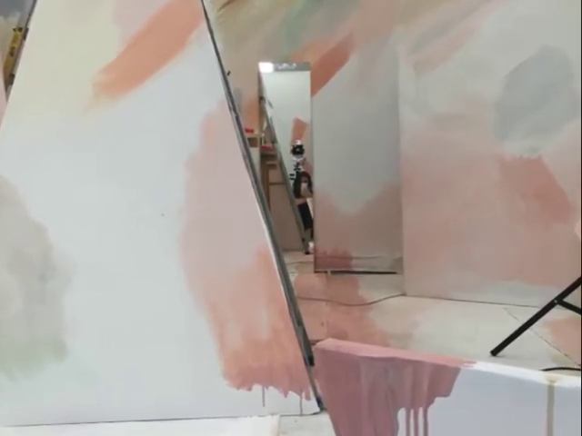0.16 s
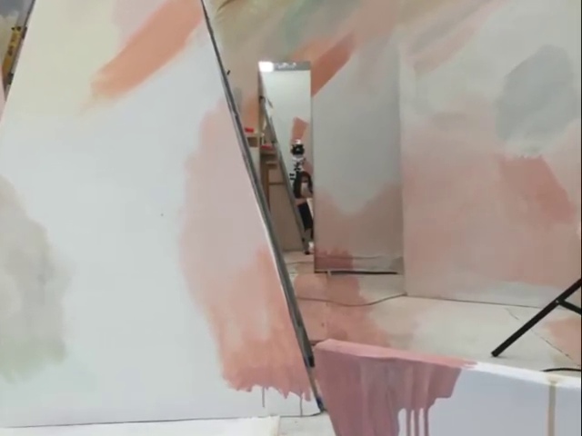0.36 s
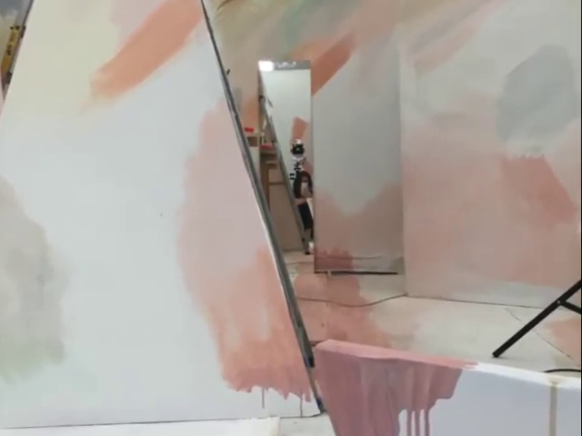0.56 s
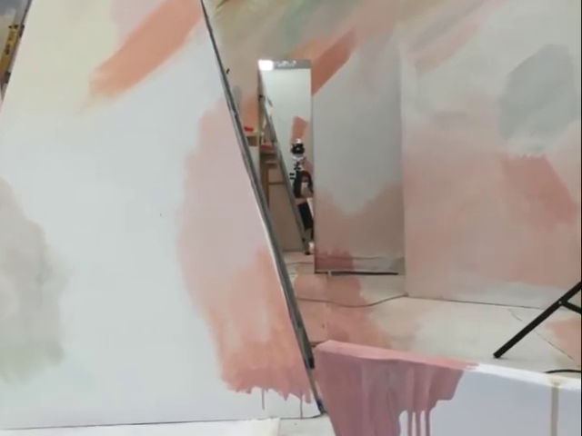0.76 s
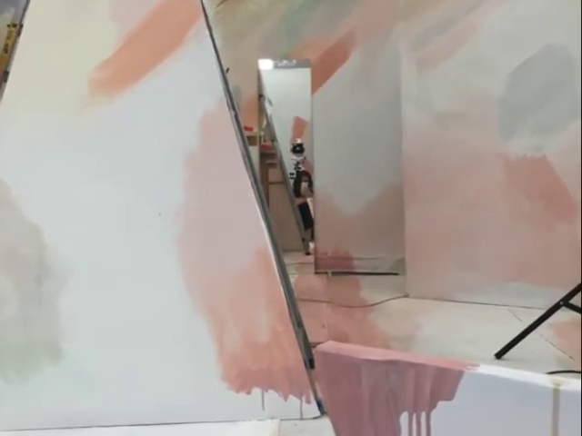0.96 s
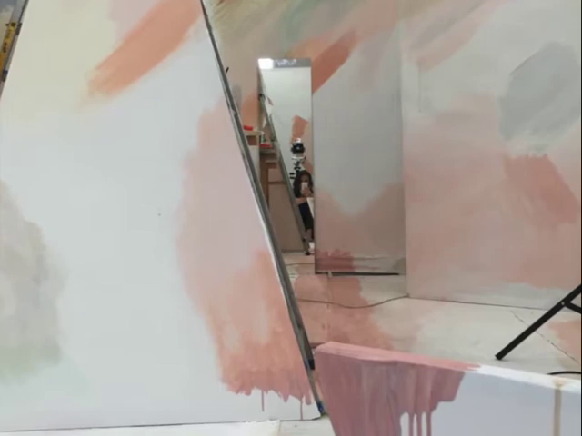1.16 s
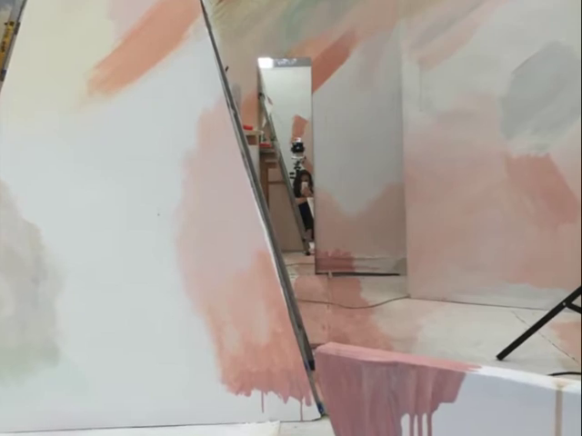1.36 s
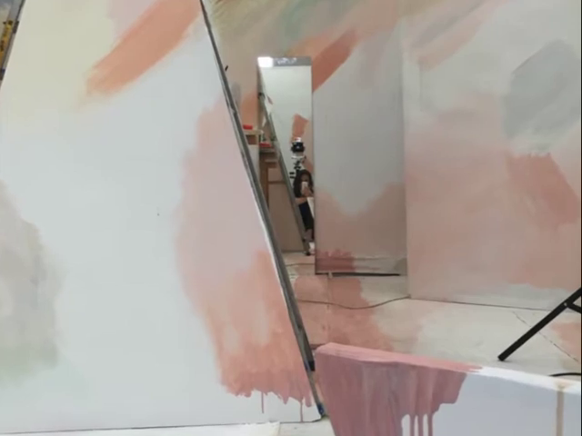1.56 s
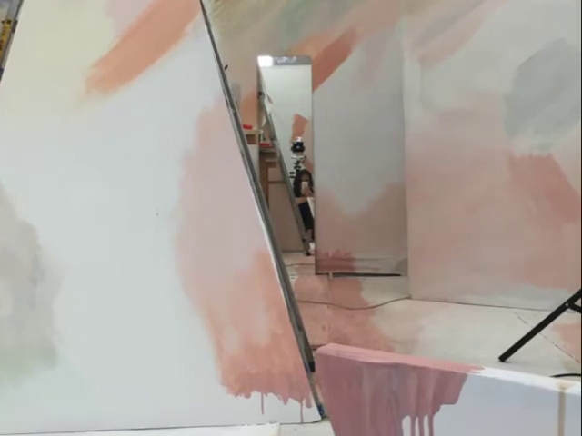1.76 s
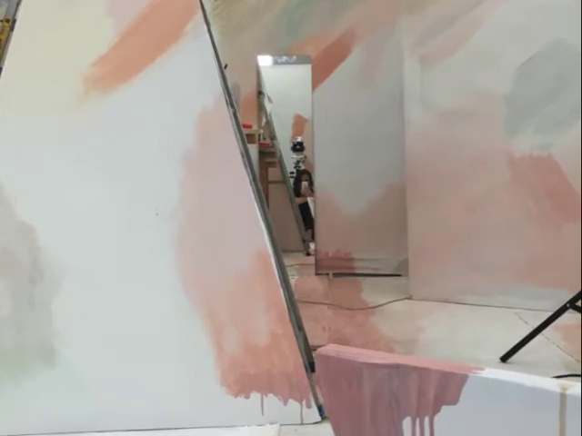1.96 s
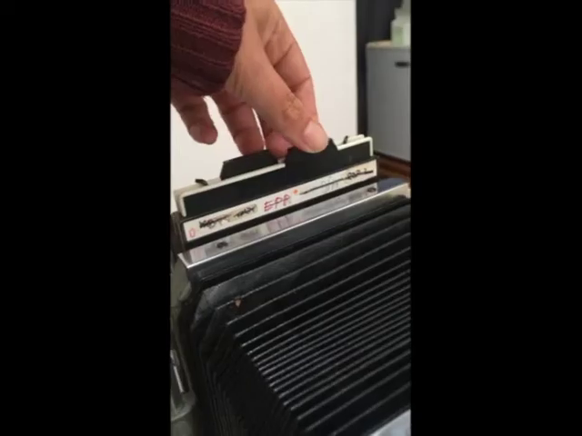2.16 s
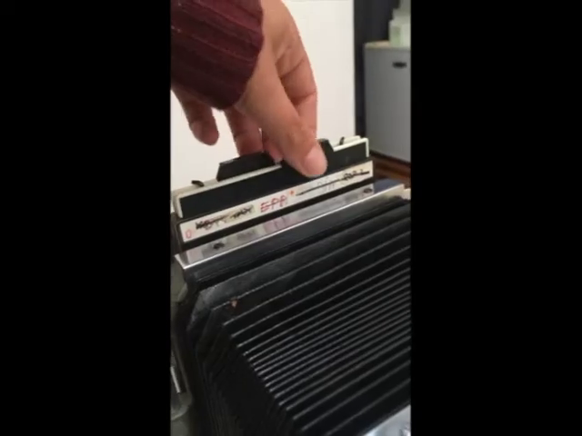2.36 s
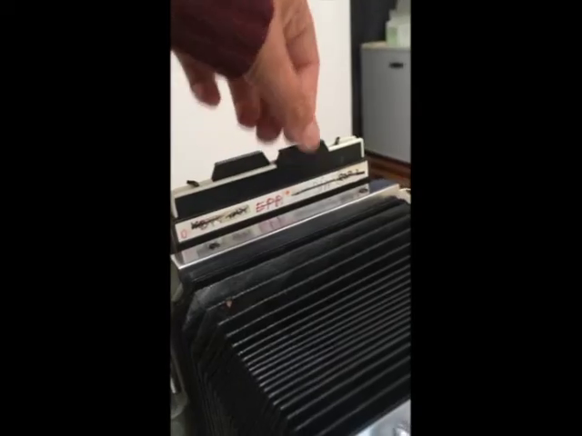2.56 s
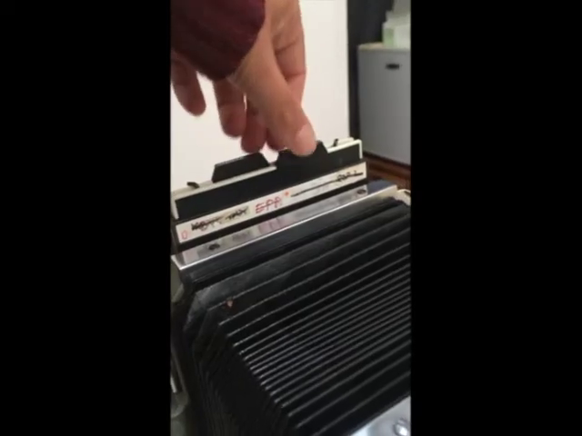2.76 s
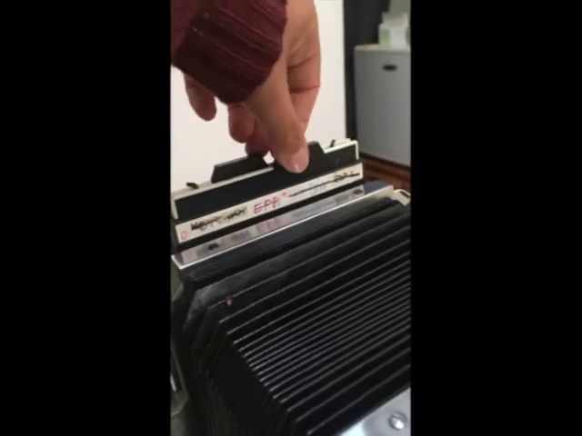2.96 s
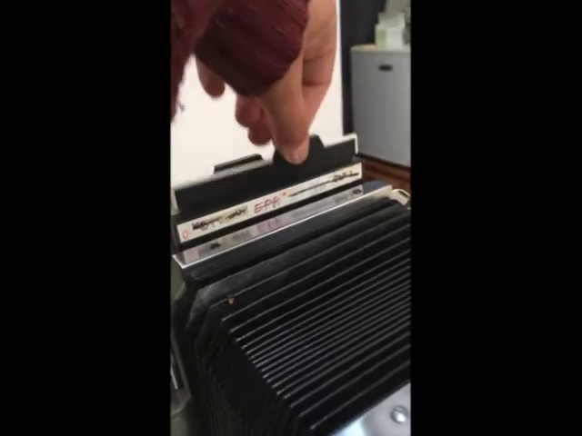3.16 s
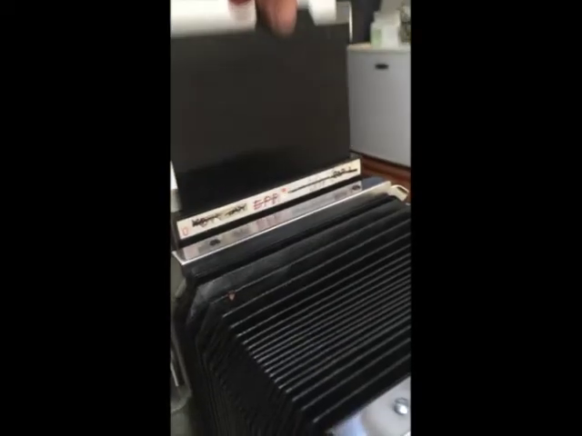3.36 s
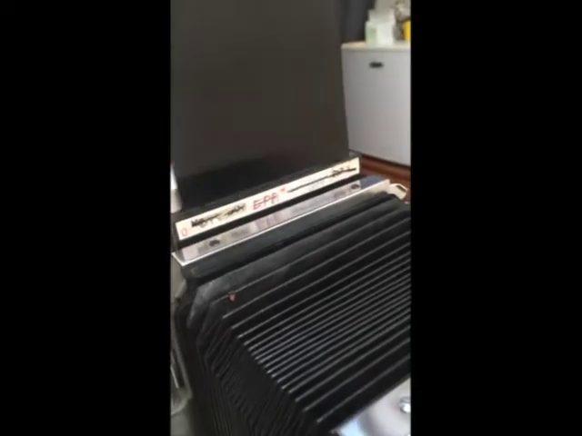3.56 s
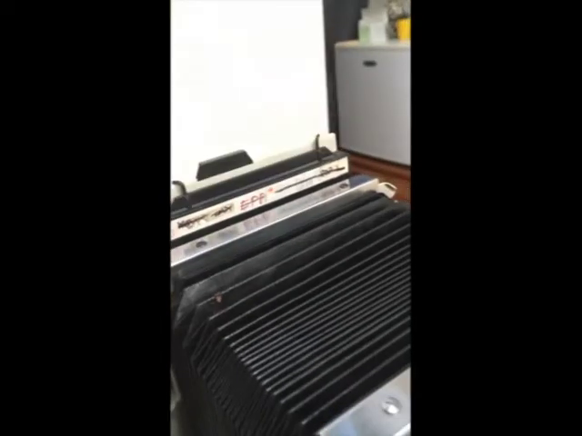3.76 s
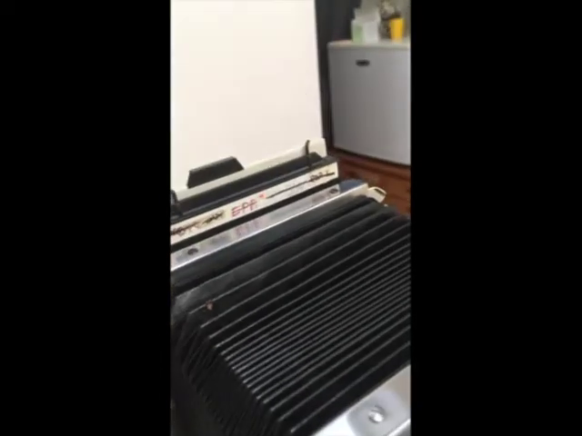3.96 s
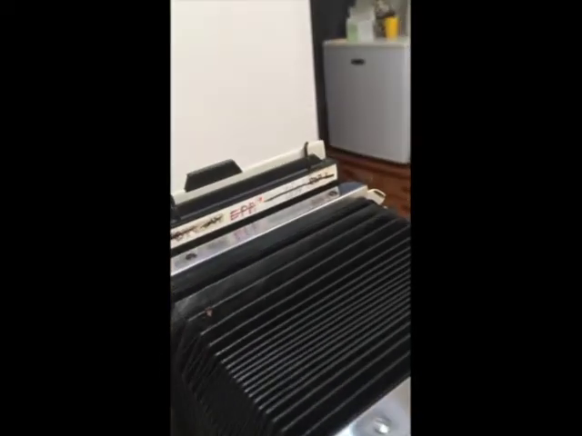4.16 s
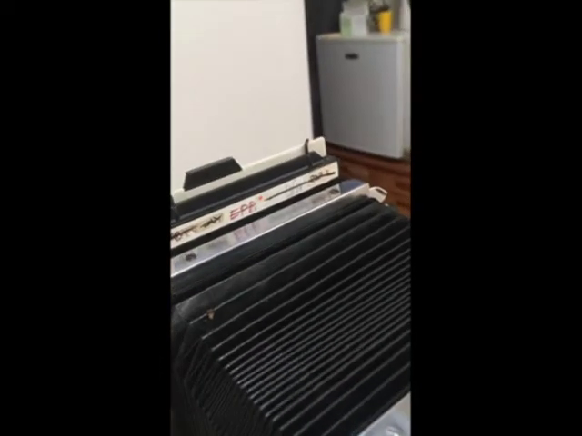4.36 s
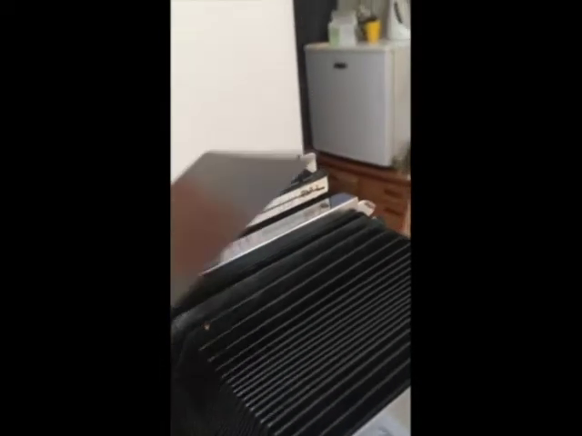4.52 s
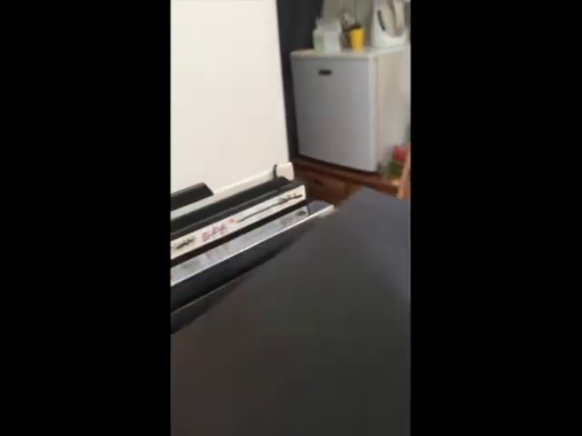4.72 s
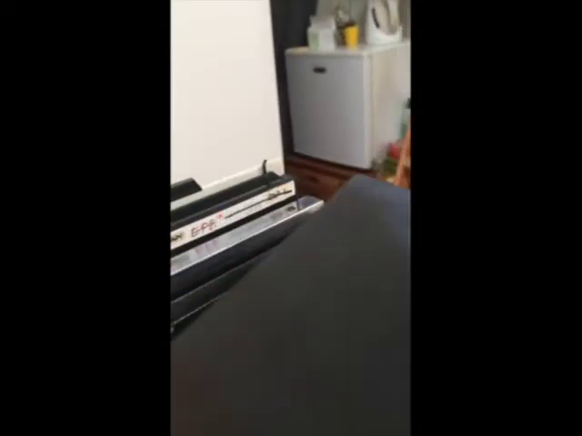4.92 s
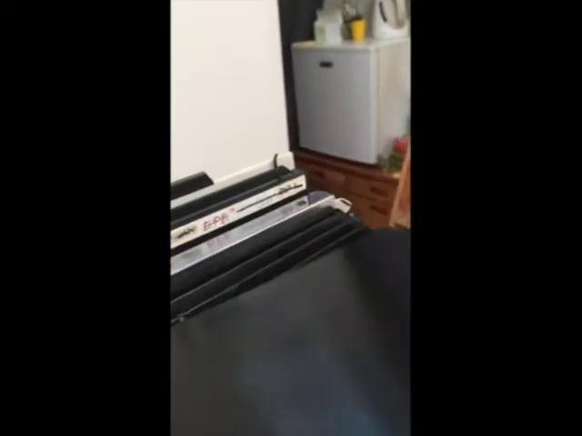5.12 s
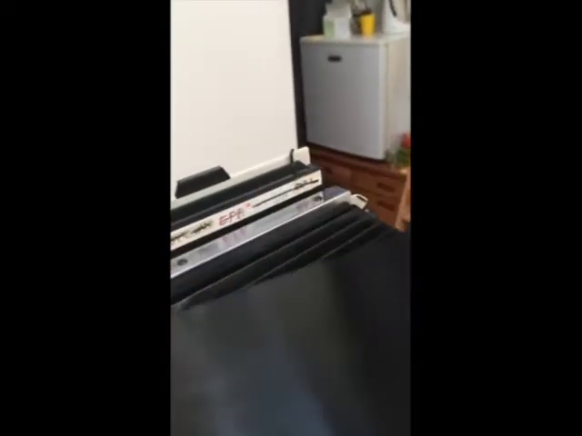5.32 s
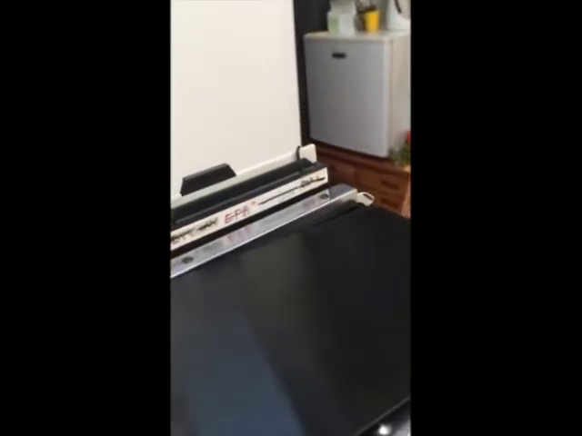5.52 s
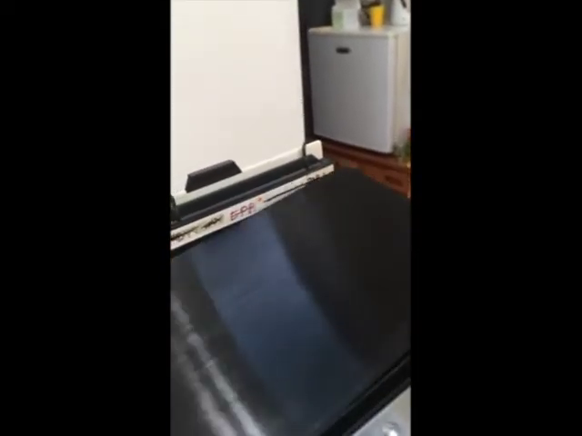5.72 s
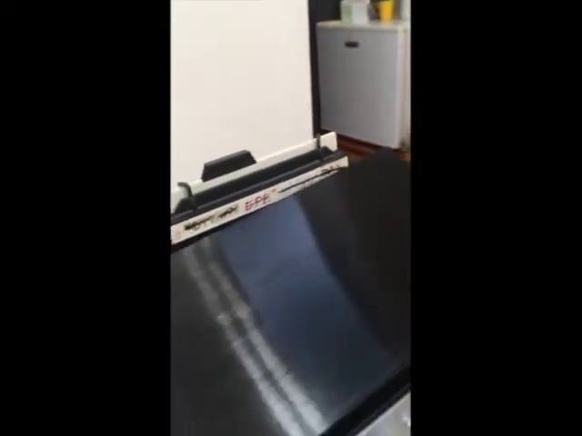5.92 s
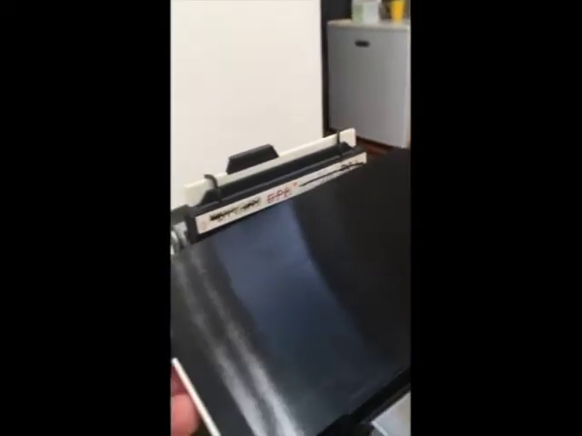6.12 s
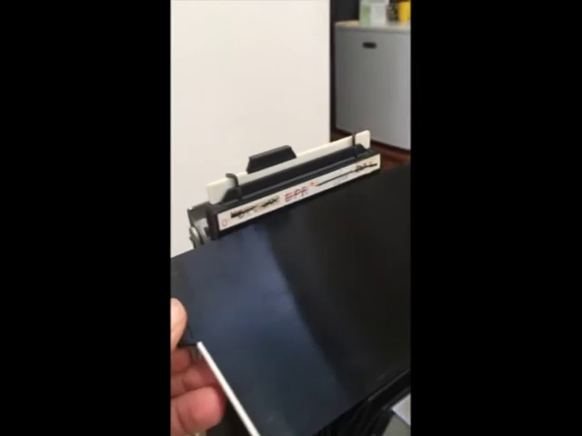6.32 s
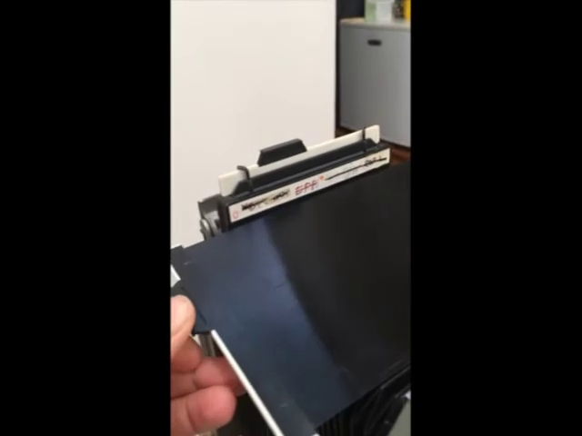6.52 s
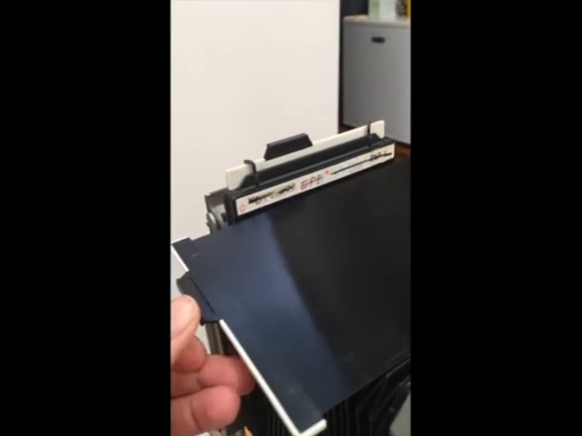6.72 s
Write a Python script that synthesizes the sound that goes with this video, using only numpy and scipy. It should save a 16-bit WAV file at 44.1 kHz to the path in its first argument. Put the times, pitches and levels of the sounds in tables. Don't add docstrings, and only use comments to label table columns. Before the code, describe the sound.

Throughout, low street rumble, wavering engine hum and faint hiss. At 0 s cloth rustles softly; around 0.6 and 1.0 s two dull distant footsteps land on floorboards with room reflections, the first firmer, amid sleeve rustle. At 2.0 s a brief dead gap marks the cut. Fingers brush plastic, with a click and scuff near 2.5 s and a tiny tick at 2.8. From 3.08 to 3.55 s a stiff sheet is pulled from a felt slot: knock, squeaky stick-slip rasp growing brighter, sharp closing clacks. Quiet until 4.47 s, a piercing hard snap with quick rebounds. At 4.75 s it drops loudly with a hollow thump, bouncing at 4.82 and faintly at 4.9. Light taps and swishing ridged drags follow from 5.1 to 5.5 s, sharp rub and clack at 5.53-5.63, then small clicks at 5.94 and 6.1-6.2, fading into hum until about 6.8.

```python
import sys
import numpy as np
from scipy import signal
from scipy.fft import rfft, irfft
from scipy.io import wavfile
from scipy.ndimage import uniform_filter1d

SR = 44100
rng = np.random.default_rng(int(sys.argv[2]) if len(sys.argv) > 2 else 0)


def persist_wave(psi):
    counts = np.round(np.clip(psi, -1, 1) * 32767).astype(np.int16)
    wavfile.write(sys.argv[1], SR, np.atleast_2d(counts).T)


def decibels_to_gain(level_db):
    exponent = np.asarray(level_db, float) / 20
    return 10 ** exponent


N = 299144


def in_time(rows, outside=None):
    s, *columns = np.transpose(rows)
    return [np.interp(np.arange(N) / SR, s, column, outside, outside) for column in columns]


def at_hz(points, hz):
    point_hz, value = np.transpose(points)
    return np.interp(np.log(hz), np.log(point_hz), value)


def rms_one(x):
    return x / np.sqrt(np.mean(x ** 2) + 1e-20)


def decay(t, t60):
    return decibels_to_gain(-60 * t / t60)


def band(x, low_hz, high_hz):
    return signal.sosfilt(signal.butter(2, [low_hz, high_hz], "band", fs=SR, output="sos"), x)


def drift(rate):
    r = np.exp(-2 * np.pi * rate * 8 / SR)
    slow = signal.lfilter([1], [1, -2 * r, r * r], rng.standard_normal(N // 8 + 5002))
    slow = rms_one(slow[5000:])
    return np.interp(np.arange(N) / 8, np.arange(len(slow)), slow)


def coloured(x, spectrum):
    hz = np.maximum(np.arange(N // 2 + 1) * SR / N, 1)
    return rms_one(irfft(rfft(x) * decibels_to_gain(at_hz(spectrum, hz)), N))


def ring(x, hz, t60):
    r, w = decibels_to_gain(-60 / (t60 * SR)), 2 * np.pi * hz / SR
    return signal.lfilter([0, np.sin(w)], [1, -2 * r * np.cos(w), r * r], x + 1e-18)


def strokes(rows):
    out, t = np.zeros((2, N)), np.arange(N) / SR
    rise_db, fall_db, roundness = 18, 26.5, 1.11
    for start, top, end, *db in rows:
        end = max(end, top + .012)
        span = slice(round(start * SR), round(end * SR))
        away = np.interp(t[span], [start, top, end], [-1, 0, 1])
        drop_db = np.where(away < 0, rise_db, fall_db) * np.abs(away) ** roundness
        out[:, span] += decibels_to_gain(np.c_[db] - drop_db)
    return uniform_filter1d(out, size=180)


# time_s, level_db
TONE = [(0, -54), (.26, -60), (1.96, -60), (2.02, -64), (3.0, -63), (4.4, -63), (5.1, -56.5), (5.3, -61),
        (5.7, -62), (6.78, -62)]
# pitch_hz, density_db_per_hz
AIR = [(15, -22.5), (25, -9), (43, -9), (65, -5), (90, -4.5), (182, -15.5), (306, -22.5), (421, -29.5),
       (724, -31), (866, -30), (1970, -34), (3000, -43.5), (3900, -53.5), (6600, -120)]
# pitch_hz, density_db_per_hz
HISS = [(1470, -24), (2500, -0.5), (3280, -5.5), (3600, -3.5), (4440, -8.5), (5740, -5.5), (6600, -4),
        (7830, -10), (8530, -4.5), (10400, -7.5), (11700, -3.5), (15200, -2.5), (16000, -15)]
# time_s, pitch_hz, level_db
LOW_DRONE = [(0, 38.8, -52), (1.0, 40.84, -41.5), (1.6, 47.5, -50.5), (2.6, 48, -45), (4.4, 47.7, -49),
             (5.1, 46.84, -50), (5.4, 42.84, -39), (6.6, 39.86, -37), (6.78, 41, -52)]
HIGH_DRONE = [(0, 71.64, -39), (.68, 74.54, -37), (.85, 78.7, -57), (1.0, 84.75, -43), (1.6, 84.15, -64),
              (1.95, 89.64, -41.5), (2.1, 82.4, -54.5), (4.2, 85.97, -45.5), (5.1, 78.9, -53.5),
              (6.78, 83, -48.5)]
# start_s, end_s
GAP_S = (1.9797, 2.0083)


def room_tone():
    air = coloured(rng.standard_normal(N), AIR)
    air /= np.std(band(air, 400, 2500))
    air *= decibels_to_gain(drift(5))
    hiss_db = -66.5 + 1.46 * (np.arange(N) < GAP_S[0] * SR)
    hiss = coloured(rng.standard_normal(N), HISS)
    out = decibels_to_gain(in_time(TONE)[0] + 0.07) * air + decibels_to_gain(hiss_db) * hiss
    for rows in (LOW_DRONE, HIGH_DRONE):
        hz, db = in_time(rows)
        phase = 2 * np.pi * np.cumsum(hz * (1 + 0.03225 * drift(4.55))) / SR
        out += decibels_to_gain(db + 0.3 + 1.0 * drift(10.0)) * np.sin(phase)
    return out


# start_s, strongest_s, end_s, dull_db, bright_db
RUSTLE = [(0, .008, 0.17, -52, -59.5), (.12, .196, 0.3, -60.5, -80), (.56, .6, 0.73, -57, -67),
          (.66, .754, 0.93, -54.5, -59), (.92, .994, 1.11, -61.5, -85), (2.2, 2.24, 2.33, -63, -64)]
# start_s, strongest_s, end_s, upper_db, lower_db
GRIP = [(2.205, 2.222, 2.27, -64, -66), (2.22, 2.262, 2.33, -66, -70), (2.39, 2.45, 2.63, -65, -58),
        (2.5, 2.522, 2.55, -52, -43.5)]


def rustle():
    dull = rms_one(band(rng.standard_normal(N), 330, 4500))
    bright = rms_one(band(rng.standard_normal(N), 6400, 18000))
    dull_gain, bright_gain = strokes(RUSTLE)
    upper_gain, lower_gain = strokes(GRIP)
    skin = rng.standard_normal(N) * decibels_to_gain(2.0 * drift(120))
    upper = rms_one(band(band(skin, 4400, 6800), 4400, 6500))
    lower = rms_one(band(skin, 840, 1940))
    return dull_gain * dull + bright_gain * bright + upper_gain * upper + lower_gain * lower


# time_s, pitch_hz, level_db, length_s
SQUEAKS = [(3.198, 9300, -40, .014), (3.141, 3200, -41, 0.022), (3.228, 2960, -38, 0.0064),
           (3.437, 4400, -33, 0.007), (3.454, 4300, -37, .006), (0.145, 1670, -59, 0.073),
           (3.121, 2280, -34, 0.017), (3.163, 4500, -35.5, 0.012), (3.173, 900, -42, 0.015),
           (3.245, 6200, -38, 0.008), (3.246, 4500, -40, 0.012), (3.281, 3680, -36, 0.017),
           (3.302, 5330, -38, 0.019), (3.307, 3020, -38, 0.0075), (3.316, 5500, -33, 0.01),
           (3.336, 3040, -32.5, 0.0057), (3.343, 5860, -34.5, 0.0092), (3.346, 3200, -36, 0.019),
           (3.4, 6000, -43.5, 0.011), (4.916, 1910, -66, 0.031), (4.919, 5700, -54.5, 0.063),
           (5.31, 4300, -52, 0.027), (5.312, 5600, -55, .02), (5.315, 7200, -52, .02),
           (5.352, 7000, -56, .03), (5.354, 3400, -60, 0.057), (5.442, 4270, -53, 0.027),
           (5.526, 4340, -33, 0.017), (5.35, 5490, -56, 0.062), (5.35, 4240, -56, 0.06),
           (5.352, 6300, -50, 0.032), (5.436, 3300, -38.5, 0.025), (5.436, 5600, -53, 0.035),
           (5.489, 2930, -45, 0.021), (5.527, 7170, -28, 0.009), (5.585, 3300, -36, 0.0097),
           (3.486, 9100, -25, 0.011), (5.281, 14200, -40, .014), (5.288, 9000, -49, .01),
           (5.31, 15000, -40, 0.013), (5.366, 13000, -40, .016), (5.377, 10100, -53, 0.025),
           (5.363, 8250, -54, .02), (5.435, 10050, -57, .025), (5.435, 14300, -55, 0.045),
           (5.436, 8150, -58, 0.0092), (5.508, 14900, -42, 0.02), (5.509, 4350, -61, 0.014),
           (5.512, 5730, -61, 0.0099)]


def squeaks():
    out = np.zeros(N)
    for (s, hz, db, length), luck in zip(SQUEAKS, rng.standard_normal((len(SQUEAKS), 4000))):
        shape = np.hanning(int(np.clip(length * SR * 1.2, 60, 4000)))
        tone = rms_one(ring(ring(luck, hz, 0.0087), hz, 0.0087))
        i = round(s * SR)
        out[i:i + len(shape)] += decibels_to_gain(db) * shape * tone[-len(shape):]
    return out


# start_s, peak_db, floor_hz, t60_s, slap_db
STEPS = [
    (0.582, -29.5, 142, 0.12, 10.5),
    (0.593, -19, 159, 0.044, -2),
    (0.625, -32, 240, 0.1, 7),
    (0.965, -35, 273.6, 0.18, 7),
    (0.985, -25, 205, 0.063, -5),
]
# hard_heel_hz, soft_sole_hz
SLAP_TOP_HZ = (745, 424)


def steps():
    out, t = np.zeros(N), np.arange(9000) / SR
    push = np.pad(np.hanning(60) / 30, (0, len(t) - 60))
    for (s, db, hz, t60, slap_db), luck in zip(STEPS, rng.standard_normal((len(STEPS), len(t)))):
        i = round(s * SR)
        top_hz = SLAP_TOP_HZ[int(s > .8)]
        slap = band(band(luck, 220, top_hz), 130, 1.34 * top_hz) * decay(t, 0.092)
        floor = ring(push, hz, t60) + .5 * ring(push, 1.51 * hz, .5 * t60)
        out[i:i + len(t)] += decibels_to_gain(db - 3.5) * (floor + decibels_to_gain(slap_db) * slap)
    return out


# pitch_hz, level_db
CRACK_PEAKS = [(6400, -8), (11800, -3.5), (15000, -4)]
# pitch_hz, level_db, t60_s
HOLDER = [(935, -6, 0.095), (980, -10, 0.045), (1240, -5, 0.014), (1417, -9, 0.023), (1720, -6.5, 0.01),
          (2980, -26, 0.0074)]
CAMERA_BACK = [(959, -5, 0.08), (900, -13, 0.03), (1200, -7.5, 0.018), (1650, -12, 0.012),
               (2246, -6, 0.024), (2900, -8, .02), (3300, -7, 0.016)]
FRAME_TOP = [(650, -8.5, 0.032), (775, -8.5, 0.037), (1003, 0, 0.054), (1115, 0, 0.033),
             (1426, -2.5, 0.033), (1820, -4, .03), (2210, -12.5, 0.03), (2570, -15, .025),
             (3155, -3, 0.013), (3400, -9.5, .018), (3650, -7, 0.024), (6470, 0, .012)]
# start_s, peak_db, ring_hz, crack_db, hollow_ring_db
SLOT_CLICKS = [(2.3505, -46.5, 3020, -42, -34), (2.4875, -26.5, 1360, -47, -5), (2.762, -46.5, 913, -45, 0),
               (2.787, -58, 606, -48, -16), (3.0065, -61, 700, -44.5, -25), (3.045, -62, 680, -54, -25),
               (3.076, -18.5, 821, -28, -14), (3.077, -25.5, 2977, -28.5, -38),
               (3.1212, -24.5, 2250, -42, -4.5), (3.168, -37, 850, -36, -4.5),
               (3.202, -23.5, 2220, -38.5, -24.5), (3.23, -37, 1637, -39, -5),
               (3.381, -29, 2970, -29.5, -21.5), (3.187, -29.5, 4220, -33.5, -24.5),
               (3.252, -29.5, 2010, -39.5, -17.5), (3.284, -29, 3300, -34, -23),
               (3.309, -28.5, 2900, -38, -26), (3.338, -28.5, 2700, -36, -20.5),
               (3.354, -27, 3300, -36, -23.5), (3.425, -40, 3420, -36, -30.5),
               (3.44, -39.5, 2600, -35.5, -24.5), (3.4624, -10, 2340, -11.5, -30.5),
               (3.4642, -13, 3230, -6.5, -21.5), (3.4935, -23.5, 3290, -17.5, -3.5),
               (3.5054, -18.5, 1240, -25, -11.5), (3.5276, -21, 3100, -14, -2),
               (3.543, -31.5, 934, -19.5, -2)]
KNOCKS = [
    (4.445, -49, 970, -56.5, -31),
    (4.4686, 1, 2260, -4.5, -21.5),
    (4.4725, -19.5, 3304, -23.5, -17.5),
    (4.48, -7, 2500, -9.5, -10.5),
    (4.4842, -19, 1600, -20, -9),
    (4.49, -18.5, 1664, -20, -5),
    (4.4945, -28, 2500, -29, -12.5),
]
DROPS = [
    (4.732, -64, 2034, -54, -24),
    (4.7546, -5, 3400, -3.5, -5),
    (4.758, -17.5, 1100, -26, -5.5),
    (4.765, -18, 3400, -20, -9),
    (4.824, -11, 3300, -8, -6.5),
    (4.909, -39, 665, -32.5, -1.5),
    (4.96, -37, 890, -50, -9.5),
]
TAPS = [(5.1, -28.5, 1240, -41, -11), (5.179, -26, 730, -27, -11), (5.219, -32, 690, -37, -7),
        (5.228, -39, 696.3, -37, -2), (5.247, -35, 1046, -56, -1), (5.256, -31.5, 900, -56, -3),
        (5.2635, -44, 3200, -54, 0), (5.447, -42, 3300, -48, -23), (5.572, -8, 3550, -8.5, -22),
        (5.5735, -13, 4230, -10.5, -30), (5.5895, -25.5, 935, -33, -1), (5.6138, -21, 776, -31, -12),
        (5.629, -26.5, 1570, -16, -16), (5.934, -28.5, 1480, -40, -12), (5.941, -21.5, 2900, -28, -5),
        (5.9435, -25, 1004, -39, -9.5), (5.949, -23, 1310, -27, -21), (6.077, -46, 3000, -44, -19),
        (6.105, -48, 3500, -58, -20), (6.109, -36.5, 867, -55, -2), (6.121, -40, 1058, -51, -6),
        (6.146, -43, 947, -62, 0.5), (6.202, -42, 2196, -53, -20), (6.21, -32.5, 1440, -32, -18.5),
        (6.212, -37, 2720, -43, -25)]


def clicks():
    out, snaps, t = np.zeros(N), np.zeros(N), np.arange(4500) / SR
    contacts = ((SLOT_CLICKS, 0.013, HOLDER), (KNOCKS, 0.0098, CAMERA_BACK),
                (DROPS, 0.008, FRAME_TOP), (TAPS, 0.025, HOLDER))
    rows = [(*row, t60, modes) for table, t60, modes in contacts for row in table]
    chance = rng.standard_normal((len(rows), len(t) + 20))
    for (s, db, hz, crack_db, hollow_db, t60, modes), luck in zip(rows, chance):
        noise = luck[:len(t)]
        burst = noise * (decay(t, 0.0032 + 1.2 * t60) + 0.017 * decay(t, 4.8 * t60))
        contact = burst / np.sqrt(np.sum(burst ** 2))
        blow = .3 * contact
        blow[:5] += [.1, .25, .3, .25, .1]
        contact[8] += 0.8
        body = .35 * ring(contact, hz, min(t60, .009))
        body += 6.3 * band(contact, 0.58 * hz, 1.5 * hz) + 3.3 * band(contact, 720, 3700)
        body = band(body, 600, 12000)
        hollow = np.zeros(len(t))
        for k, (mode_hz, level_db, mode_t60) in enumerate(modes):
            mode_gain = decibels_to_gain(level_db + 2.0 * luck[-1 - k])
            hollow += (-1) ** k * mode_gain * ring(blow, mode_hz, mode_t60)
        snap = noise * (decay(t, 0.0057) + 0.045 * decay(t, 0.039))
        snap[8] += 2
        i = round((s + 0.0003) * SR)
        out[i:i + len(t)] += decibels_to_gain(db) * (body / np.abs(body).max() + decibels_to_gain(hollow_db) * hollow)
        snaps[i:i + len(t)] += decibels_to_gain(crack_db + 4.5) * snap / np.abs(snap).max()
    snaps += 1e-18
    out += band(snaps, 5300, 19000)
    for top_hz, level_db in CRACK_PEAKS:
        out += decibels_to_gain(level_db) * band(snaps, 0.94 * top_hz, 1.08 * top_hz)
    return out


def flaring(grains, modes, flare_db, rate):
    return rms_one(sum(decibels_to_gain(db + flare_db * drift(rate)) * rms_one(ring(grains, hz, 6.3 / width_hz))
                       for hz, width_hz, db in modes))


def grit(per_s, cycles):
    height = decibels_to_gain(6.8 * rng.exponential(1, N).clip(0, 4)) * rng.choice([-1, 1], N)
    slips = (rng.random(N) < per_s / SR) * height
    dealt = rng.integers(0, 16, N)
    out = np.zeros(N)
    for k, hz in enumerate(np.geomspace(1500, 5200, 16)):
        t60 = cycles / hz
        out += ring(ring(slips * (dealt == k), hz, t60), hz, t60) * hz ** 1.28
    return rms_one(out)


# pitch_hz, density_db_per_hz
FELT = [(3530, -52), (6000, -4.5), (7460, -8.5), (9010, 3), (10400, 2), (11300, 5.5), (15100, 6),
        (16000, 3.5)]
# pitch_hz, width_hz, level_db
PLATE = [(900, 135, -5), (1630, 1500, 5), (2500, 400, -2), (3200, 530, 5), (4500, 820, -6.5),
         (5700, 370, -54.5)]
EDGE = [(3450, 18, 4), (3550, 91, -11), (4350, 160, 9), (5500, 100, 3), (6280, 112, -12), (7100, 100, -12),
        (8200, 150, -14), (10070, 120, -9), (13900, 300, 3), (14700, 160, -2.5)]
FOLD = [(9110, 62, -14), (10000, 190, -11), (10700, 43, 1), (12200, 65, -6), (13300, 130, -4),
        (14000, 51, 3), (14200, 78, -3), (15000, 150, 2), (15600, 45, -1)]
# start_s, strongest_s, end_s, hiss_db, plate_db
SCUFFS = [(2.37, 2.472, 2.6, -51, -55.5), (2.485, 2.524, 2.44, -46, -49.5), (2.75, 2.766, 2.83, -74, -63),
          (3.115, 3.125, 3.77, -54, -52), (3.455, 3.465, 3.487, -20.5, -32),
          (3.476, 3.488, 3.5, -17.5, -35), (3.38, 3.4, 3.425, -31, -70), (3.17, 3.187, 2.95, -41, -56),
          (3.49, 3.503, 3.524, -31, -35), (3.52, 3.532, 3.458, -50, -33.5), (4.87, 4.914, 5.02, -54, -50.5),
          (4.89, 4.954, 5.01, -40, -80), (4.96, 5.0, 5.27, -64, -57), (5.095, 5.11, 5.17, -59.5, -57),
          (5.178, 5.185, 5.24, -57.5, -60), (5.255, 5.278, 5.37, -53, -55), (5.57, 5.577, 5.62, -43.5, -45),
          (5.595, 5.605, 5.77, -49, -64), (5.611, 5.616, 5.62, -29, -39), (5.63, 5.639, 5.58, -40, -39),
          (3.04, 3.074, 3.9, -51, -55.5), (6.09, 6.106, 6.17, -61.5, -61.5), (6.13, 6.148, 5.6, -67.5, -60)]
# time_s, effort_db
PULL = [(3.083, -59.5), (3.125, -51.5), (3.18, -39.5), (3.3, -34.5), (3.37, -31), (3.4, -34.5),
        (3.425, -37.5), (3.455, -35.5)]
# start_s, peak_db, plate_db, length_s
RUBS = [(2.482, -24, -26.5, 0.012), (3.281, -21, -38, 0.01), (3.447, -17, -27, 0.0086),
        (3.492, -2, -21, 0.0041), (5.527, -8.5, -20.5, 0.013), (5.536, -18, -23.5, 0.016),
        (5.586, -14, -29.5, 0.0065), (5.594, -18.5, -37, 0.0051), (3.546, -22, -23, 0.0045),
        (5.928, -30, -33.5, 0.017)]
# start_s, strongest_s, end_s, hiss_db, whistle_db
SWISH = [(5.24, 5.256, 4.6, -51, -53), (5.26, 5.278, 5.2, -46, -67), (5.275, 5.293, 5.32, -35, -74),
         (5.298, 5.319, 5.3, -39, -50.5), (5.32, 5.34, 5.34, -47, -64), (5.34, 5.362, 5.33, -34.5, -54),
         (5.36, 5.388, 5.44, -43, -53), (5.425, 5.44, 5.465, -57, -51), (5.435, 5.457, 5.3, -50, -58),
         (5.476, 5.498, 5.5, -45, -54), (5.49, 5.518, 5.1, -42.5, -49)]


def drag():
    hiss_gain, plate_gain = strokes(SCUFFS)
    swish_gain, edge_gain = strokes(SWISH)
    effort_db, = in_time(PULL, -300)
    hiss_gain += uniform_filter1d(decibels_to_gain(effort_db - 1), size=180)
    plate_gain += uniform_filter1d(decibels_to_gain(-41 + 0.53 * (effort_db + 32.0)), size=180)
    for s, hiss_db, plate_db, length in RUBS:
        shape = signal.windows.tukey(max(round(length * SR), 50), .4)
        i = round(s * SR)
        hiss_gain[i:i + len(shape)] += decibels_to_gain(hiss_db - 17.0) * shape
        plate_gain[i:i + len(shape)] += decibels_to_gain(plate_db - 11.5) * shape
    grains = rng.standard_normal((2, N)) * decibels_to_gain(2.2 * rng.exponential(1, (2, N)).clip(0, 5))
    clumps, ticks = drift(71), drift(250)
    hiss = coloured(grains[0], FELT) * decibels_to_gain(.9 * clumps + 1.0 * drift(400) + 1.6 * ticks)
    plate = flaring(grains[1], PLATE, 2.5, 50) + 1.4 * rms_one(band(grains[1], 1500, 8000))
    plate += .4 * grit(1200, 22.0) + .6 * grit(1500, 5.0)
    plate = rms_one(band(plate, 650, 9000)) * decibels_to_gain(1.5 * clumps + 2.0 * ticks)
    edge = flaring(grains[1], EDGE, 3.5, 20) + .4 * grit(700, 30.0)
    edge += 1.0 * rms_one(band(grains[1], 2500, 7000))
    swish = hiss + 0.94 * band(hiss, 13300, 16500) + 0.5 * flaring(grains[0], FOLD, flare_db=3.0, rate=29)
    return hiss_gain * hiss + swish_gain * rms_one(swish) + plate_gain * plate + edge_gain * edge


# start_s, peak_db, pitch_hz, t60_s
FRAME = [(2.489, -23.5, 178, 0.067), (3.079, -29, 161, 0.057), (3.464, -23, 236, 0.027),
         (3.546, -31, 193, 0.15), (4.472, -24.5, 289, 0.026), (4.473, -22.5, 154, 0.073),
         (4.756, -10, 292, 0.085), (4.756, -19, 405, 0.031), (4.762, -12, 116, 0.051),
         (4.764, -12.5, 201.5, 0.093), (4.827, -24, 203.5, 0.5), (4.915, -37, 335, 0.25),
         (4.986, -30.5, 122.8, 0.069), (4.827, -20.5, 316.7, 0.23), (4.826, -24.5, 101, 0.12),
         (4.909, -26.5, 573, 0.032), (4.911, -41, 95, 0.052), (4.961, -26.5, 120, 0.034),
         (5.18, -35.5, 276, 0.055), (5.25, -35, 271.7, 0.074), (5.536, -28, 362, 0.042),
         (5.574, -26.5, 518.8, 0.012), (5.589, -28, 610, 0.018), (5.613, -46, 448, 0.019),
         (4.47, -21, 600, 0.028), (5.63, -28.5, 193, 0.045), (5.945, -30.5, 164.2, 0.29),
         (5.95, -32.5, 83.7, 0.29)]


def thumps():
    out, t = np.zeros(N), np.arange(20000) / SR
    damped_s, damping_s = 4.962, .012
    push = np.pad(np.hanning(70) / 35, (0, len(t) - 70))
    for (s, db, hz, t60), luck in zip(FRAME, rng.standard_normal((len(FRAME), len(t)))):
        i = round(s * SR)
        stilled = 1
        if s < damped_s - .02:
            stilled = np.exp(-np.clip(s + t - damped_s, 0, 1) / damping_s)
        leather = 1.21 * band(luck, 67, 520) * decay(t, 0.14)
        out[i:i + len(t)] += decibels_to_gain(db) * stilled * (ring(push, hz, t60) + leather)
    return out


# pitch_hz, t60_s
STUDIO = [(150, 0.37), (1000, 0.46), (3000, 0.38), (8000, 0.37), (15000, 0.15)]


def studio(x):
    t, tail = np.arange(SR) / SR, np.zeros(SR)
    for hz in 90 * 2. ** np.arange(8):
        octave = band(rng.standard_normal(SR), hz / np.sqrt(2), hz * np.sqrt(2))
        tail += octave * decay(t, at_hz(STUDIO, hz))
    tail *= np.clip(t / 0.0016, 0, 1)
    return signal.fftconvolve(x, tail / np.sqrt(np.sum(tail ** 2)))[:N]


def scene():
    near, far = clicks() + thumps() + drag() + squeaks(), steps()
    near = near - 0.25 * band(near, 4500, 5600)
    room = studio(decibels_to_gain(-19.5) * near + decibels_to_gain(-4.0) * far)
    return (near + far + rustle() + room + room_tone())[None]


def top_cut(x):
    return signal.sosfilt(signal.butter(12, 16500, fs=SR, output="sos"), x)


def record(dry):
    t = np.arange(N) / SR
    x = signal.sosfilt(signal.butter(4, 34, "high", fs=SR, output="sos"), dry)
    x = signal.sosfilt(signal.cheby2(10, 30, 16100, fs=SR, output="sos"), x)
    silent = (t > GAP_S[0]) & (t < GAP_S[1])
    x = np.clip(x, -1, 1) * np.where(silent, 0, 1)
    return top_cut(x)


dry = scene()
out = record(dry)
persist_wave(out)
```